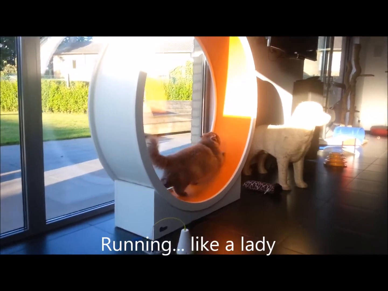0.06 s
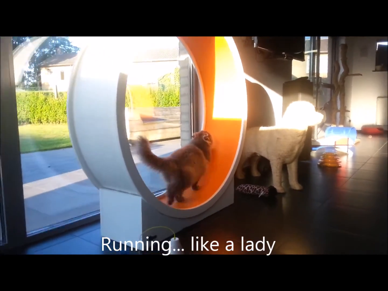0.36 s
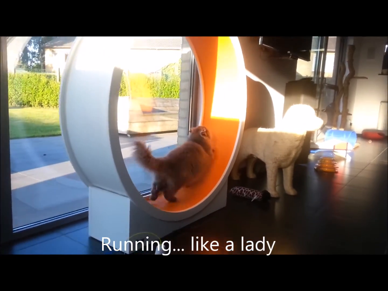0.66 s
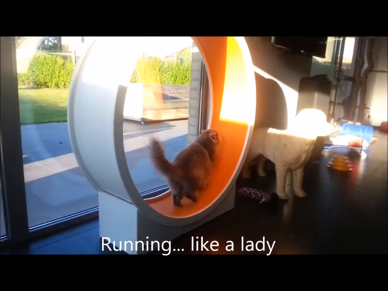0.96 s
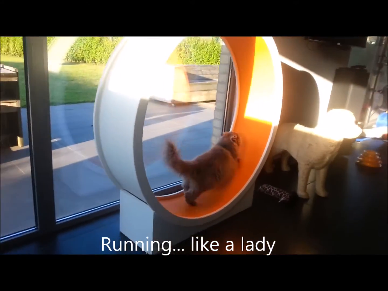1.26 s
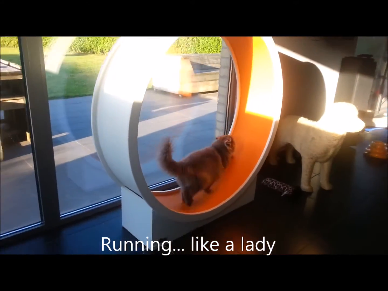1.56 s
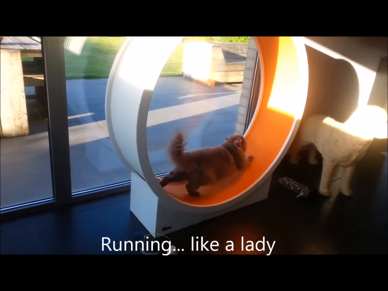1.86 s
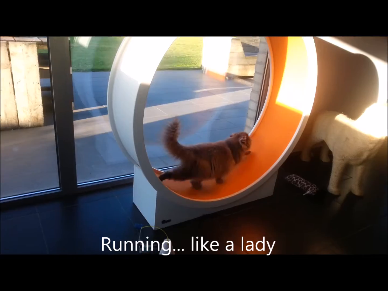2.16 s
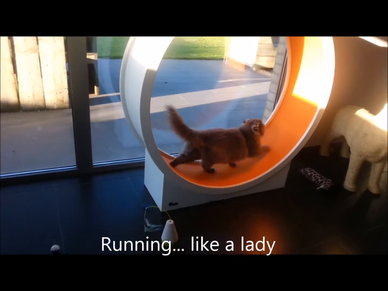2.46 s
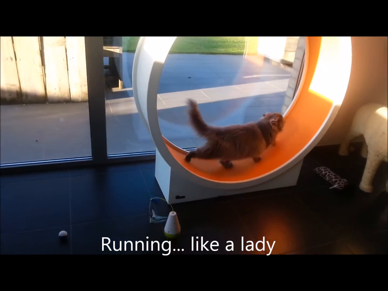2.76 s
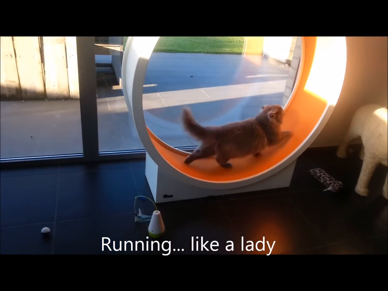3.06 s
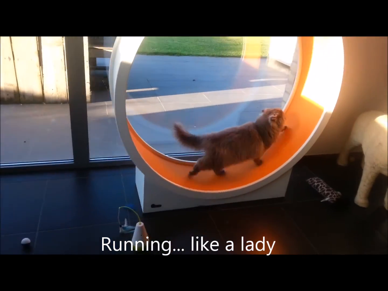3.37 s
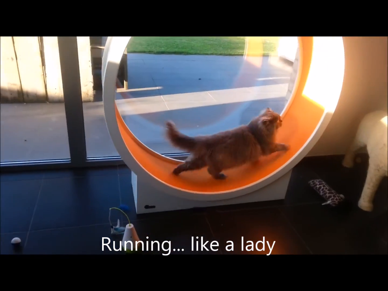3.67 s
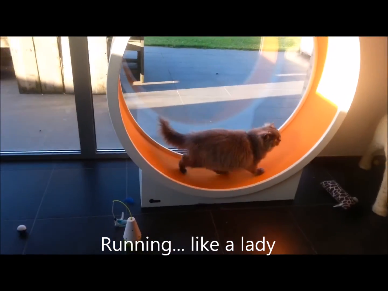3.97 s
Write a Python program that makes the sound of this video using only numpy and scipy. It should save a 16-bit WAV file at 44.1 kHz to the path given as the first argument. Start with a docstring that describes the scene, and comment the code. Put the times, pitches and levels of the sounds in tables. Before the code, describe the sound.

A large plastic wheel rolls with a hollow rumble under a trotting cat's soft paws.

```python
"""Cat in an exercise wheel

A cat trots inside a large plastic wheel in a hard-floored room, a little to the right. The rim rumbles, hisses
and judders on its rollers, louder as the cat pushes, and at times clatters with a gritty rasp as the joints
between its segments pass over the rollers. Paws and bumps knock the hollow drum; claws tick on the running
surface, with a few faint squeaks."""
import sys
import numpy as np
from scipy import signal
from scipy.fft import rfft, irfft, next_fast_len
from scipy.io import wavfile
from scipy.ndimage import map_coordinates

SR = 44100
rng = np.random.default_rng(int(sys.argv[2]) if len(sys.argv) > 2 else 0)


def inscribe(sig):
    """Save sig as 16-bit PCM at rate SR to the path in sys.argv[1].

    A 1-D sig is mono; a 2-D sig holds one channel per row.
    Samples are clipped to [-1, 1] before scaling.
    """
    pcm = np.round(np.clip(np.atleast_2d(sig).T, -1, 1) * 32767)
    wavfile.write(sys.argv[1], SR, pcm.astype(np.int16))


N = 176400

# Levels are relative within each table.
ROLL_LEVELS = [(0.0, -32, -47), (0.56, -32.5, -45), (0.77, -31, -45.5), (1.0, -27, -39), (1.12, -28, -41.5),
               (1.46, -29.5, -43), (1.89, -28, -41), (2.39, -32.5, -46.5), (2.85, -30.5, -45),
               (3.17, -33, -47), (3.36, -34.5, -45), (3.49, -27.5, -42.5), (3.6, -30.5, -44),
               (4.0, -31.5, -45.5)]  # rolling effort: t/s, rumble/dB, hiss/dB
RUMBLE_SPECTRUM = [(25, -54), (55, -40), (80, -23.5), (105, -19.5), (125, -29), (145, -9), (168, -0.5),
                   (225, 0), (255, -3), (300, -0.5), (440, 0), (540, -3.5), (740, -5.5), (1050, -8.5),
                   (1500, -13), (2100, -25.5), (4000, -53.5)]  # drum rumble: f/Hz, level/dB
HISS_SPECTRUM = [(300, -18), (900, -3.5), (1600, 5.5), (2200, 2), (3100, -1.5), (4200, -3.5), (5100, -6.5),
                 (6000, -15), (7200, -16), (8400, -16.5), (9800, -18.5), (11000, -27.5), (12300, -28),
                 (14500, -63)]  # rollers on the rim: f/Hz, level/dB
SQUEAK_EVENTS = [(.675, -43, 2620), (.916, -39, 2460), (.955, -46, 2250), (1.04, -49, 4950),
                 (1.058, -47, 5000), (1.105, -51, 5030)]  # roller and pad squeaks: t/s, level/dB, f/Hz
SCRAPE_EVENTS = [(0.8, 0.042, -46.5), (0.911, 0.11, -47), (1.101, 0.043, -50), (1.234, 0.017, -42.5),
                 (1.486, 0.033, -42), (1.673, 0.052, -48), (2.6, 0.038, -50), (3.481, 0.043, -44)]  # gritty rasp in the joint clatter: t/s, length/s, level/dB
SCRAPE_SPECTRUM = [(700, -13), (1500, 8), (2600, 6.5), (4000, -1), (5500, -8), (10000, -29), (13000, -54)]  # joint grit: f/Hz, level/dB
JOLT_EVENTS = [(.002, -33.5), (.17, -38), (0.808, -31), (.835, -44), (.91, -38), (.94, -42), (.972, -39),
               (1.02, -47), (1.075, -35), (1.239, -32), (1.462, -32.5), (1.495, -38), (1.67, -33.5),
               (1.695, -30), (1.96, -32.5), (1.99, -36.5), (2.599, -32.5), (2.62, -39), (2.858, -35),
               (2.886, -38.5), (2.961, -34.5), (3.308, -27.5), (3.477, -36), (3.54, -36.5)]  # segment joints over the rollers: t/s, level/dB
CLATTER_SPECTRUM = [(200, -13), (560, 7), (800, -2.5), (1200, 0.5), (2000, -14), (4000, -15.5),
                    (6000, -25.5), (9500, -31.5), (12000, -55)]  # plastic clatter: f/Hz, level/dB
CLAW_TICKS = [(.168, -39, -49, -4), (.180, -49, -47, -11), (0.294, -47, -50.5, 6), (0.348, -46, -46.5, -9),
              (0.4567, -59, -47.5, -8), (0.512, -41, -44, -12), (0.522, -40, -46.5, -14),
              (.62, -43, -47, -2), (0.773, -43, -53, 4), (.808, -39, -52, -2), (.878, -48, -49, 1),
              (0.914, -38, -43.5, -12), (1.0924, -32, -41, 2), (1.318, -40, -53, 3),
              (1.4475, -41, -47.5, 3), (1.572, -42, -50.5, -12), (1.7087, -37, -42.5, -24),
              (1.752, -41, -48, -9), (1.8842, -42, -41.5, 2), (1.97, -55, -45.5, -6), (2.0, -46, -45, -11),
              (2.019, -37, -44, -14), (2.108, -40.5, -60, -7), (2.1575, -44, -45, -9),
              (2.183, -43, -48, -8), (2.244, -47, -50, -10), (2.3536, -51, -47, -7), (2.7968, -43, -44, -2),
              (2.958, -38, -44, -4), (3.073, -46, -52.5, -6), (3.1328, -35.5, -48, 7),
              (3.251, -53, -53.5, -3), (3.3061, -38, -42, -16), (3.316, -36, -47, -14),
              (3.483, -39.5, -45.5, -7), (3.64, -40.5, -49, -9), (3.799, -47, -48, -6),
              (3.954, -51, -46.5, -13)]  # claw strikes: t/s, click/dB, snap/dB, spark re snap/dB
CLICK_SPECTRUM = [(600, -0.5), (1800, 3), (3000, 3.5), (4200, 3.5), (5200, -17), (6500, -31), (12000, -53)]  # low band of a tick: f/Hz, level/dB
SNAP_SPECTRUM = [(2500, -27), (4800, 10), (7000, 0), (9500, -0.5), (11000, -16.5), (14500, -44)]  # high band of a tick, also grit: f/Hz, level/dB
SPARK_SPECTRUM = [(8000, -29), (11000, 4.5), (12300, -15), (14500, -5)]  # top band of a tick: f/Hz, level/dB
SURFACE_MODES = [(4540, 1, 0.25), (4670, 0, 0.42), (6330, 2, .08), (8300, -2, 0.063)]  # running surface modes: f/Hz, level/dB, t60/s
DRUM_MODES = [(169, -11.5, 0.045), (223, -10, 0.13), (299, -6, 0.037), (347.2, -3, 0.12), (416, 3, 0.098),
              (442.6, 0, 0.12), (461.1, 1, 0.12), (499, -6, 0.053), (565, -5.5, 0.093), (612, -12.5, 0.096),
              (856.5, -15.5, 0.073), (1001, -8, 0.068), (1066, -17.5, 0.066)]  # hollow drum modes: f/Hz, level/dB, t60/s
RIM_BUMPS = [(.003, -22.5, 406), (.065, -25, 405), (.169, -26, 575), (.261, -27.5, 433), (.404, -25, 440),
             (.722, -33, 460), (.807, -22.5, 417), (.825, -22, 592), (0.935, -23, 440), (.974, -27, 410),
             (1.008, -27, 457), (1.058, -35, 345), (1.091, -22, 570), (1.121, -24, 470), (1.186, -27, 470),
             (1.244, -23, 345), (1.309, -26, 445), (1.4, -25, 454), (1.46, -23, 438), (1.495, -20.5, 454),
             (1.581, -21.5, 446), (1.665, -23, 540), (1.695, -26, 440), (1.793, -26.5, 460),
             (1.841, -20, 410), (1.953, -19, 365), (2.036, -30, 440), (2.2, -29, 425), (2.294, -27, 424),
             (2.351, -24.5, 420), (2.448, -27, 435), (2.498, -26.5, 446), (2.548, -32, 410),
             (2.595, -20, 418), (2.679, -27, 410), (2.854, -20, 430), (2.886, -22, 466), (3.034, -25, 372),
             (3.068, -27, 434), (3.099, -27, 432), (3.136, -23, 466), (3.203, -24.5, 427),
             (3.243, -23.5, 413), (3.311, -20.5, 565), (3.352, -25, 570), (3.373, -25.5, 460),
             (3.477, -19.5, 397), (3.539, -30, 444), (3.577, -24, 463), (3.642, -25.5, 460)]  # bumps over the rollers: t/s, level/dB, focus f/Hz
FOOTFALLS = [(0, -27.5, 216), (.135, -33, 219), (.343, -32, 228), (0.468, -31, 220), (0.623, -32, 219.7),
             (.782, -26.5, 214), (0.964, -28, 202), (1.054, -32, 202), (1.158, -38.5, 178),
             (1.231, -31.5, 175.7), (1.366, -32.5, 176), (1.486, -29, 175.7), (1.659, -28.5, 165.7),
             (1.722, -34, 189.6), (1.878, -29.5, 170), (1.959, -39, 176), (2.161, -31, 173),
             (2.41, -32, 176), (2.594, -27, 178), (2.745, -32.5, 166.5), (3.098, -33, 169),
             (3.273, -36, 186), (3.475, -30.5, 166), (3.672, -34, 183), (3.792, -42, 192)]  # paw landings: t/s, level/dB, f/Hz
STEREO_CORRELATION = [(30, .2), (60, 0.7), (150, 0.93), (290, 0.97), (630, 0.8), (1380, 0.2), (2500, 0.12),
                      (6000, 0.017)]  # noise likeness, left to right: f/Hz, correlation
STEREO_BALANCE = [(60, -7), (99, -2), (160, -2.5), (270, -3), (440, -2.0), (730, -2.5), (1200, -5.5),
                  (1970, -4), (3250, 0), (5350, -7.5), (8800, -9), (14500, 4.5)]  # left minus right: f/Hz, level/dB

ROOM_T60_S, JOLT_ATTACK_S, SLIP_T60_S = 0.42, 0.0025, 0.012


def amp(db):
    """Decibels to gain."""
    return 10 ** (np.asarray(db) / 20)


def unit(x):
    """Scale to rms 1."""
    return x / np.sqrt(np.mean(x ** 2) + 1e-20)


def along(points, hz):
    """Interpolate (f/Hz, value) points on a log axis."""
    f, v = np.transpose(points)
    return np.interp(np.log(hz + 1), np.log(f + 1), v)


def wobble(rate_hz):
    """Smooth random curve."""
    knots = rng.standard_normal(int(N * rate_hz / SR) + 4)
    return map_coordinates(knots, [np.arange(N) * rate_hz / SR])


def filtered(x, response):
    """Apply a gain given as a function of frequency."""
    m = next_fast_len(N + SR // 2)
    return irfft(rfft(x, m) * response(np.fft.rfftfreq(m, 1 / SR)), m)[..., :N]


def noise(spectrum):
    """Stereo noise, rms 1: alike in the bass, diffuse in the treble."""
    def response(hz):
        angle = np.arccos(np.clip(along(STEREO_CORRELATION, hz), -1, 1)) / 2
        return amp(along(spectrum, hz)) * [np.cos(angle), np.sin(angle)]
    mid, side = filtered(rng.standard_normal((2, N)), response)
    return unit(np.array([mid + side, mid - side]))


def add(track, at_s, sound):
    """Mix a sound into a track."""
    start = int(np.clip(at_s * SR, 0, N - 1))
    track[start:start + len(sound)] += sound[:N - start]


def bursts(times_s, levels_db, shape):
    """Envelope of overlapping bursts, summed in power."""
    power = np.zeros(N)
    for at_s, db in zip(times_s, levels_db):
        add(power, at_s, (amp(db) * shape / shape.max()) ** 2)
    return np.sqrt(power)


def fade(attack_s, t60_s):
    """Quick rise, exponential decay."""
    t = np.arange(SR // 3) / SR
    return (1 - np.exp(-t / attack_s)) * amp(-60 * t / t60_s)


def room(x):
    """Diffuse reverberation, different in each channel."""
    tail = rng.standard_normal((2, SR // 3)) * fade(0.0078, ROOM_T60_S)
    return signal.fftconvolve(x[None], tail / np.linalg.norm(tail[0]), axes=1)[:, :N]


def rolling(rumble_db, hiss_db, scuffs_per_s=66):
    """The rim runs on its rollers: uneven rumble, hiss and fine grit."""
    uneven = wobble(55)
    rumble = amp(rumble_db - 3.5 + 0.75 * uneven) * noise(RUMBLE_SPECTRUM)
    hiss = amp(hiss_db - 1.5 + 0.87 * uneven + 0.39 * wobble(360)) * noise(HISS_SPECTRUM)
    grit = noise(SNAP_SPECTRUM)
    when, size = rng.random((int(scuffs_per_s * N / SR), 2)).T
    scuffs = bursts(when * N / SR, -22 - 10 * np.log(size + 0.055), fade(0.00014, 0.0084))
    return rumble + hiss + amp(hiss_db - 10.5) * scuffs * grit


def drum_resonance(x, lift_db=4.5, width_hz=11.3, above_hz=330):
    """Steady shaking is lifted around the drum's upper modes."""
    modes_hz = [hz for hz, _, _ in DRUM_MODES if hz > above_hz]
    peaks = lambda hz: sum(np.exp(-((hz - mode) / width_hz) ** 2) for mode in modes_hz)
    return filtered(x, lambda hz: amp(lift_db * peaks(hz)))


def drum(times_s, levels_db, foci_hz, focus_db=10.5, width_hz=37, scatter_db=1.5, detune=0.01):
    """Each blow rings the drum's modes in a new mix; where it lands decides which ring most."""
    hz, db, t60_s = np.transpose(DRUM_MODES)
    decays = np.array([fade(0.0031, life_s)[:SR // 7] for life_s in t60_s])
    t, track = np.arange(decays.shape[1]) / SR, np.zeros(N)
    for at_s, level_db, focus_hz in zip(times_s, levels_db, foci_hz):
        size, shift, phase = rng.standard_normal((3, len(hz)))
        near = np.exp(-((hz - focus_hz) / width_hz) ** 2)
        gains = amp(db * (1 - near) + focus_db * near + scatter_db * size)
        detuned_hz = hz * (1 + detune * shift)
        ring = gains @ (decays * np.sin(2 * np.pi * detuned_hz[:, None] * t + phase[:, None]))
        add(track, at_s, amp(level_db) * ring / ring[:SR // 30].std())
    return track


def judder(rumble_db, turn_hz=23.46, jitter_s=0.004075, spread_db=2):
    """Out-of-round rollers bump the drum once a turn, favouring no mode."""
    turns_s = np.arange(int(turn_hz * N / SR)) / turn_hz
    late, size = rng.uniform(-0.977, 1, (len(turns_s), 2)).T
    ring = drum(turns_s + jitter_s * late, spread_db * size, np.zeros(len(turns_s)))
    return amp(rumble_db - 8) * unit(ring)


def squeaks(width_hz=340, t60_s=0.06):
    """A roller or pad rubs briefly: a thin, rough, high note."""
    pair = np.zeros((2, N))
    for at_s, db, pitch_hz in SQUEAK_EVENTS:
        band = lambda hz: np.exp(-((hz - pitch_hz) / width_hz) ** 2)
        note = unit(filtered(rng.standard_normal((2, N)), band))
        pair += bursts([at_s], [db], fade(0.002, t60_s)) * note
    return pair


def scrapes(slips_per_s=210, spread_db=5):
    """The joint clatter rasps in many tiny slips."""
    envelope, shape = np.zeros(N), fade(0.00022, SLIP_T60_S)
    for at_s, length_s, db in SCRAPE_EVENTS:
        count = max(2, int(length_s * slips_per_s))
        when, size = rng.random((60, 2))[:count].T
        slips = bursts(at_s + length_s * when, spread_db * size, shape)
        envelope += amp(db) * slips / np.sqrt(np.sum(slips ** 2) / (length_s * SR))
    return envelope * noise(SCRAPE_SPECTRUM)


def jolts(t60_s=0.25):
    """A joint between rim segments passes over the rollers with a short plastic clatter."""
    times_s, db = np.transpose(JOLT_EVENTS)
    envelope = bursts(times_s, db, fade(JOLT_ATTACK_S, t60_s))
    return envelope * noise(CLATTER_SPECTRUM) * amp(0.48 * wobble(250))


def surface_ring(times_s, levels_db, scatter_db=2):
    """Each tick rings the surface's bright modes, in a new mix per channel."""
    hz, db, t60_s = np.transpose(SURFACE_MODES)
    decays = np.array([fade(0.0011, life_s) for life_s in t60_s])
    t, pair = np.arange(decays.shape[1]) / SR, np.zeros((2, N))
    for at_s, level_db in zip(times_s, levels_db):
        for track in pair:
            size, phase = rng.standard_normal((2, len(hz)))
            modes = decays * np.sin(2 * np.pi * (hz[:, None] * t + phase[:, None]))
            add(track, at_s, amp(level_db + db + scatter_db * size) @ modes)
    return pair


def claws(t60_s=0.032, room_db=-14, drag_s=0.03, catches=3):
    """A claw ticks, drags and rings the surface; the room trails the tick, bar its top band."""
    times_s, click_db, snap_db, spark_db = np.transpose(CLAW_TICKS)
    direct = fade(0.0006, t60_s)
    wet = np.hypot(direct, amp(room_db) * fade(0.0018, ROOM_T60_S))
    spark = bursts(times_s, snap_db + spark_db - 8, direct) * noise(SPARK_SPECTRUM)
    catches_s = times_s[:, None] + drag_s * rng.random((len(times_s), catches))
    drag = bursts(catches_s.ravel(), np.repeat(snap_db - 8.5, catches), fade(0.0002, SLIP_T60_S))
    snap = np.hypot(bursts(times_s, snap_db + 1.2, wet), drag) * noise(SNAP_SPECTRUM)
    click = bursts(times_s, click_db, wet) * noise(CLICK_SPECTRUM)
    return click + snap + spark + surface_ring(times_s, snap_db - 10.5)


def thuds(gain_db=-15.5, t60_s=0.07):
    """Each bump shakes the whole shell with a short, rough thud."""
    times_s, db, _ = np.transpose(RIM_BUMPS)
    return bursts(times_s, db + gain_db, fade(JOLT_ATTACK_S, t60_s)) * noise(RUMBLE_SPECTRUM)


def knocks(gain_db=-8):
    """Bumps over the rollers knock the hollow drum."""
    times_s, db, foci_hz = np.transpose(RIM_BUMPS)
    return drum(times_s, db + gain_db, foci_hz)


def paws(attack_s=0.0062, t60_s=0.19, overtone_ratio=1.65, overtone_db=-3):
    """Each padded footfall swells softly into the drum's low resonance."""
    shape, track = fade(attack_s, t60_s), np.zeros(N)
    t = np.arange(len(shape)) / SR
    for at_s, db, hz in FOOTFALLS:
        phase = 2 * np.pi * rng.random(2)
        fundamental = np.sin(2 * np.pi * hz * t + phase[0])
        overtone = amp(overtone_db) * np.sin(2 * np.pi * hz * overtone_ratio * t + phase[1])
        add(track, at_s, amp(db) * (fundamental + overtone) * shape / shape.max())
    return track


def scene(room_db=-7, low_cut_hz=141):
    """Contacts, squeaks and rolling, leaning right."""
    times_s, *levels_db = np.transpose(ROLL_LEVELS)
    rumble_db, hiss_db = [np.interp(np.arange(N) / SR, times_s, db) for db in levels_db]
    ring = knocks() + judder(rumble_db)
    contacts = jolts() + thuds() + paws() + claws() + scrapes() + ring + amp(room_db) * room(ring)
    low_cut = signal.butter(4, low_cut_hz, "high", fs=SR, output="sos")
    mix = signal.sosfilt(low_cut, contacts) + squeaks() + drum_resonance(rolling(rumble_db, hiss_db))
    return filtered(mix, lambda hz: amp(along(STEREO_BALANCE, hz) * np.array([[0.5], [-0.5]])))


def record(dry):
    """Brick-wall low-pass."""
    top_hz = 14750
    return filtered(dry, lambda hz: hz < top_hz)


dry = scene()
out = record(dry)
inscribe(out)
```